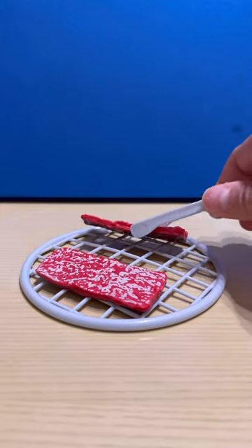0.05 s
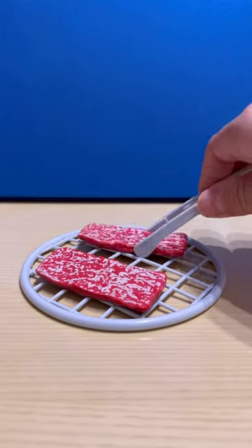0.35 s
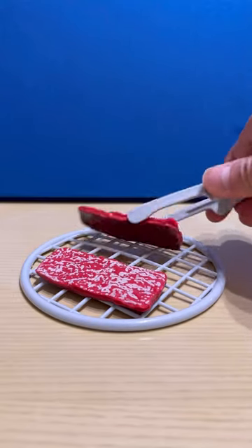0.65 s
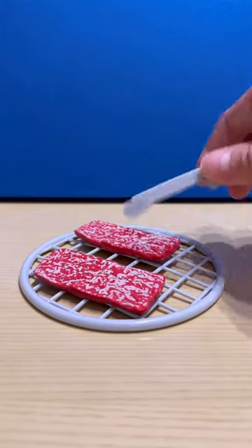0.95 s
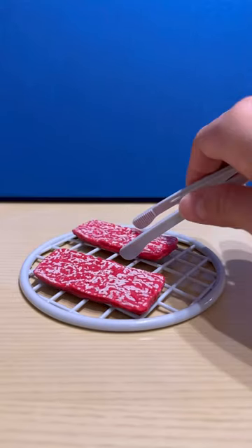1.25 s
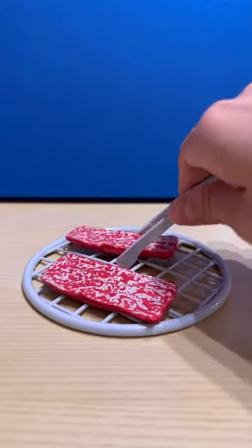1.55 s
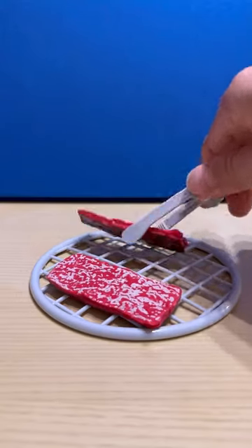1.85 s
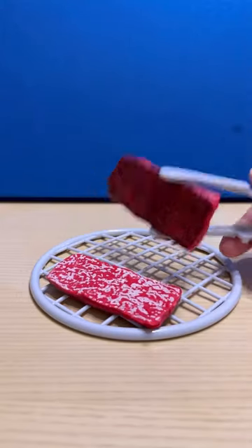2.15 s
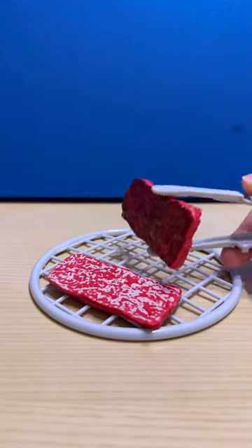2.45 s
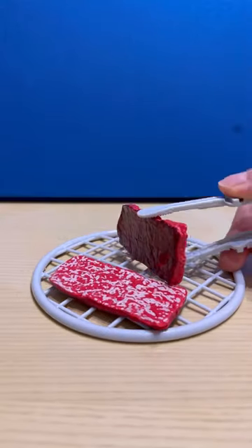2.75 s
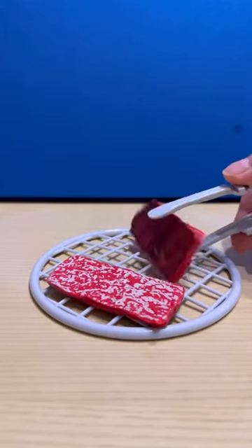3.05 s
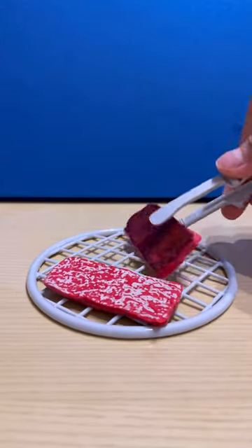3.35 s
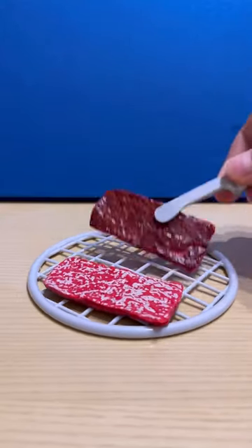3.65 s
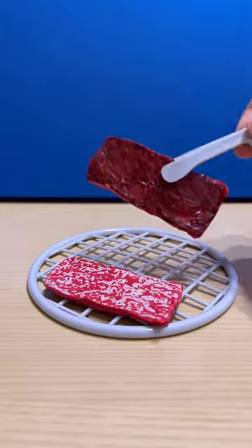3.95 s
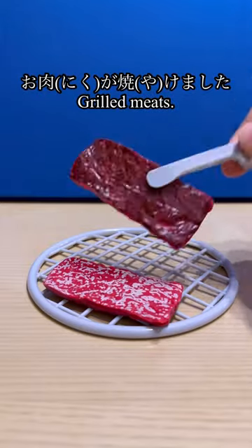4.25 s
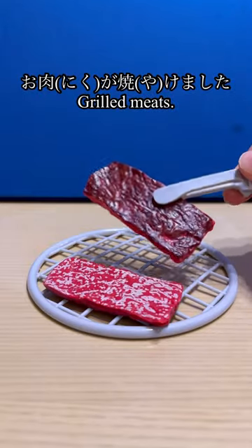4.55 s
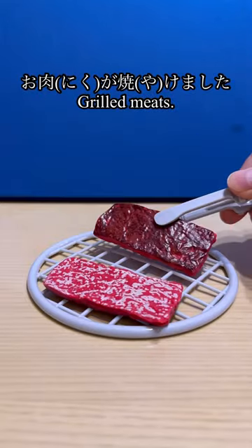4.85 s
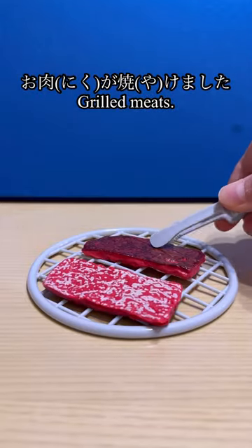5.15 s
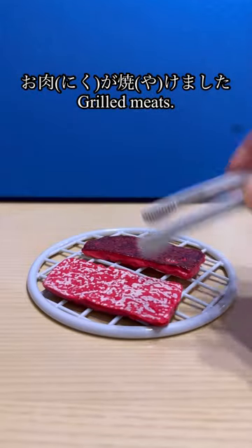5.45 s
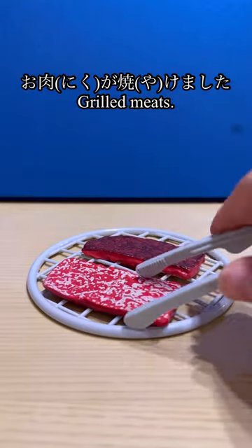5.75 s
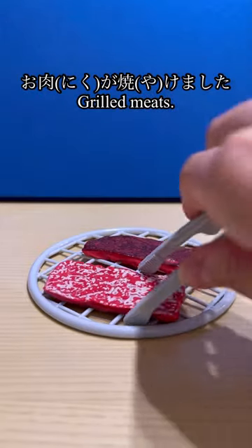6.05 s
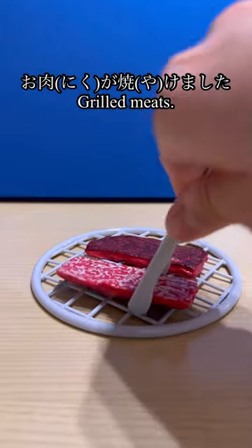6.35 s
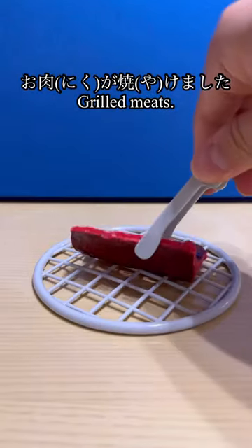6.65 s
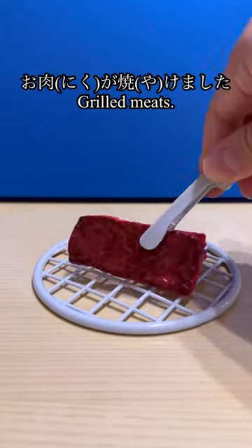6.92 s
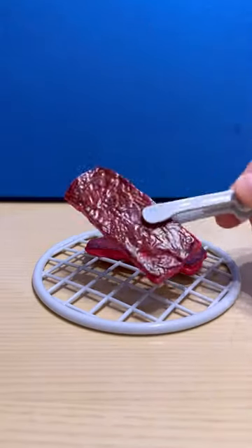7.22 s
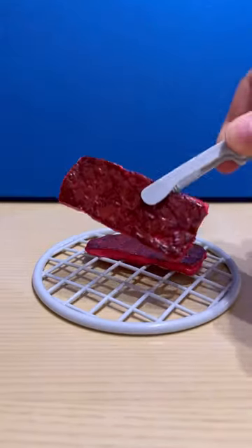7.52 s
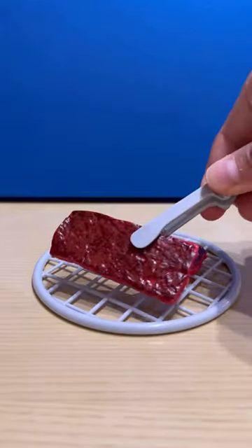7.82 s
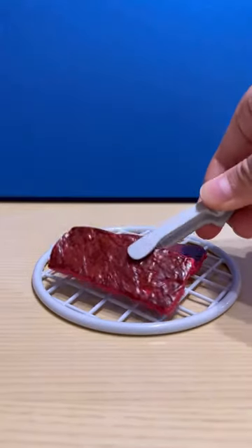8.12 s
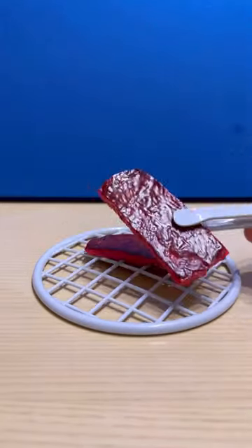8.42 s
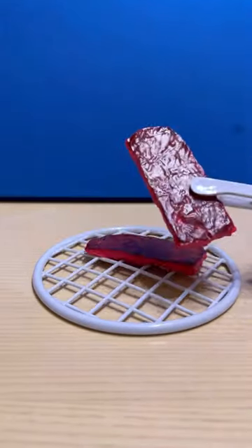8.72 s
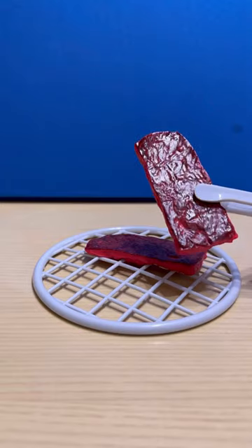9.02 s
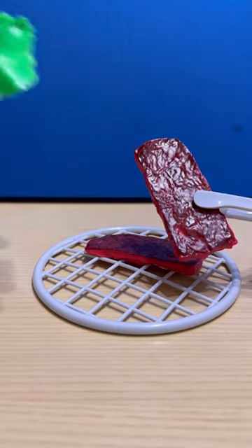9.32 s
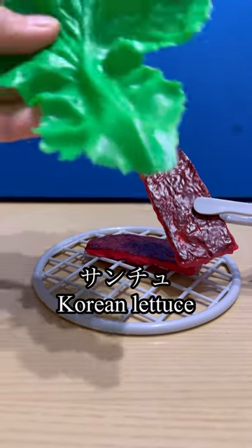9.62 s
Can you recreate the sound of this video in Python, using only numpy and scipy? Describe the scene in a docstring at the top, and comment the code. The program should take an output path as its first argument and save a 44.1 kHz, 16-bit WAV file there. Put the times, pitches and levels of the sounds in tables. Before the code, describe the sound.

Light plastic clicks, brief scrapes and small rattling landings of toy food on a toy grill, close by in a quiet, humming room.

```python
"""Tongs on a toy grill

Plastic tongs turn toy meat slices on a small plastic grill that stands on a table close by.
An impact is an impulse and clicks; sliding friction is a train of tiny slips and chatters.
Either force excites the damped modes of the plastic and thuds through to the tabletop.
A small room adds a short tail, an appliance hums, air flows and electronics whine faintly in pulses."""
import sys
import numpy as np
from scipy import signal
from scipy.fft import rfft, irfft
from scipy.io import wavfile

SR = 44100
rng = np.random.default_rng(int(sys.argv[2]) if len(sys.argv) > 2 else 0)


def put_to_file(sound):
    """Save the sound as 16-bit audio at rate SR, in the file named by the first command-line argument."""
    columns = np.atleast_2d(sound).T  # one column per channel
    safe = np.clip(columns, -1, 1)
    whole_steps = np.round(safe * 32767)
    wavfile.write(sys.argv[1], SR, whole_steps.astype(np.int16))


N = 435708
SIZE = 16384  # samples in one short sound
T = np.arange(SIZE) / SR
HZ = np.maximum(np.fft.rfftfreq(SIZE, 1 / SR), 1)
IMPULSE = np.where(T == 0, 1., 0.)


# slices landing on the grill: start_s, level_db, hardness_db_per_octave, graze_s, rattle_s, rattle_db
LANDINGS = [(0.7539, -22, 1.4, 0.0087, 0.055, -34), (.8018, -24.5, 3, 0.0064, 0.038, -29.5),
            (0.8326, -31.5, 1.5, 0.0042, 0.046, -27), (1.3954, -38, -2.5, .021, .01, -56),
            (1.6178, -37, 0, 0.027, .004, -42.5), (3.0054, -25.5, 2, .023, .038, -27.5),
            (3.0663, -33.5, 1.5, 0.0036, .036, -29.5), (5.1394, -33.5, 2.5, .005, 0.011, -30.5)]

def landings(out):
    """Impact and rebound: a slice grazes the bars, strikes, then rattles in small, duller bounces."""
    for start_s, db, hardness, graze_s, rattle_s, rattle_db in LANDINGS:
        bounces = slips(rattle_s, per_s=1200, scatter_db=6)
        add(out, start_s - graze_s, contact(start_s, slips(graze_s), db - 19.5, hardness=-3))
        add(out, start_s, impact(start_s, db, hardness))
        add(out, start_s + .005, contact(start_s, bounces, rattle_db, hardness - 1.44))


# single taps of tongs and slices: start_s, level_db, hardness_db_per_octave
TAPS = [(0.2166, -52.5, 0.5), (0.3015, -60, -.5), (1.04, -45.5, 4.5), (1.309, -50.5, 1.5),
        (1.4335, -48, -2.5), (2.7505, -56.5, -6), (3.083, -33, 1.5), (3.102, -33.5, 0.5),
        (3.2079, -55.5, -0.5), (3.426, -46, 2.5), (3.4387, -36.5, 10), (3.4423, -35, -2.5),
        (3.462, -31.5, .5), (4.7504, -54, -4), (5.781, -59.5, -5), (5.979, -55, -4.5), (6.028, -56.5, -6.5),
        (6.549, -44.5, -7), (6.597, -55.5, -5.5), (6.6741, -58, 0), (7.998, -54.5, -5)]

def taps(out):
    """Impulse response: each lone blow sounds the plastic and the table as one click."""
    for start_s, db, hardness in TAPS:
        add(out, start_s, impact(start_s, db, hardness))


# tongs sliding over a slice or the bars: start_s, length_s, level_db, hardness_db_per_octave
SCRAPES = [(.23, 0.015, -45.5, -1), (0.509, 0.032, -52, -3.5), (.657, 0.03, -49.5, -4),
           (1.045, 0.01, -46.5, -2.5), (1.23, 0.0041, -44, -1.5), (1.336, 0.029, -52, -1),
           (1.377, 0.017, -49, -3), (2.638, 0.067, -56, -7), (2.688, 0.0071, -47, -4),
           (2.843, 0.027, -49.5, -6), (3.385, .02, -50.5, -3.5), (4.661, 0.023, -46.5, -4.5),
           (5.046, 0.023, -42, -6), (5.123, .013, -44, -6), (5.735, 0.016, -54, -2),
           (5.906, 0.032, -55, -3.5), (6.427, 0.0065, -47, -2.5), (6.512, 0.044, -48, -2),
           (6.698, .043, -42.5, -2.5), (6.717, 0.048, -40.5, -5.5), (9.05, .029, -57.5, 2.5)]

def scrapes(out):
    """Frictional excitation: a train of slips drives the same modes as a blow."""
    for start_s, length_s, db, hardness in SCRAPES:
        add(out, start_s, contact(start_s, slips(length_s), db, hardness))


def slips(length_s, per_s=1700, scatter_db=5, grip_s=.003, release_s=.0037):
    """Stick-slip friction: random force pulses build up, weaken and stop."""
    slipping = rng.random(SIZE) < per_s / SR
    strength = undb(scatter_db * np.clip(rng.standard_normal(SIZE), -2, 2))
    sign = rng.choice([-1, 1], SIZE)
    grip = 1 - np.exp(-T / grip_s)
    fade = np.exp(-np.minimum(T / length_s, 1) - np.maximum(T - length_s, 0) / release_s)
    return slipping * sign * strength * grip * fade


def impact(start_s, db, hardness):
    """Impulsive excitation: a single blow, with less ring than a slide."""
    return contact(start_s, IMPULSE, db, hardness, ring_db=-3)


def contact(start_s, force, db, hardness, ring_db=0):
    """Structural coupling: one force drives plastic and table; soft, light contacts thud more."""
    thud_share_db = -5 - .52 * hardness - .27 * (db + 40)
    return plastic(start_s, force, db, hardness, ring_db) + tabletop(force, db + thud_share_db)


# broad spectrum of a contact: frequency_hz, gain_db
CONTACT_SPECTRUM = [(400, -19.5), (800, -1.5), (1400, -2), (2900, -3.5), (4500, -5.5), (6200, -3.5),
                    (8700, -4.5), (12800, -0.5), (14500, -13), (16500, -22)]
# resonances of the grill: pitch_hz, bandwidth_hz, gain_db
GRILL_MODES = [(1036, 18, -2.5), (2610, 230, -5.5), (3330, 280, -10.5), (8550, 670, 2)]
# close pair of bending modes of the tongs' arms: pitch_hz, bandwidth_hz, gain_db
TONG_MODES = [(1829, 80, 4), (1874, 130, 7.5)]
# how freely the tongs ring, less under a firm grip: time_s, gain_db
TONG_FREEDOM = [(.55, 2), (.75, -6), (.9, -3), (1.2, 0), (1.7, 0), (2.6, -6), (6, -6), (6.55, -1), (8, -1)]

def plastic(start_s, force, db, hardness, ring_db):
    """Modal ringing: a snap and a brief crack, then the decay of the plastic and the room."""
    snap = decay(t60_s=.0066, side_db=-3.5)
    crack = undb(.5 * ring_db + 1) * decay(t60_s=.016, side_db=-5)
    ring = decay(t60_s=.1, side_db=-6.5, delay_s=.0022)
    room = undb(-9) * decay(t60_s=.24, side_db=-3.5, delay_s=.0057)
    # the lower modes carry more of the tail than the treble
    lingering = undb(ring_db + curve([(1000, 6), (2500, 3), (6000, 2), (13000, -6)], HZ))
    response = rfft(snap + crack) + lingering * rfft(ring + room)
    # a softer contact loses the top octaves above 2.2 kHz
    treble_octaves = np.log2(np.clip(HZ, 2200, 12000) / 2200)
    colour = causal(curve(CONTACT_SPECTRUM, HZ) + hardness * treble_octaves)
    freedom_db = np.interp(start_s, *np.transpose(TONG_FREEDOM))
    body = resonances(GRILL_MODES) * resonances(TONG_MODES, lift_db=freedom_db)
    return at_level(irfft(rfft(force) * response * colour * body), db)


# resonances of the grill on the tabletop: pitch_hz, bandwidth_hz, gain_db
TABLE_MODES = [(185, 23, 10.5), (298.3, 29.3, 5), (403, 80, 9), (618, 35, 0.5)]
# broad spectrum of the tabletop: frequency_hz, gain_db
THUD_SPECTRUM = [(50, -27.5), (110, -4), (160, 4), (450, 1), (800, -1.5), (1300, -22), (8000, -77)]

def tabletop(force, db):
    """Structure-borne sound: a force on the table radiates as a short knock with a room tail."""
    knock = decay(t60_s=.023, side_db=-17)
    room = undb(-8) * decay(t60_s=.2915, side_db=-13, delay_s=.0054)
    body = resonances(TABLE_MODES) * causal(curve(THUD_SPECTRUM, HZ))
    return at_level(irfft(rfft(force) * rfft(knock + room) * body), db)


# faint creaks of the tongs in the fingers: start_s, peak_db, centre_hz
CREAKS = [(1.77, -48.5, 2580), (1.901, -50.5, 2700), (5.0163, -48.5, 2480), (6.338, -49.5, 2900),
          (8.23, -50, 4020), (8.3597, -55, 3800), (8.535, -52, 3500), (8.83, -51, 3000), (9.268, -54, 3400)]

def creaks(out, q=.58):
    """Stick-slip at the grip: a few tiny slips excite a heavily damped resonance and the room."""
    skin = 1 / (1 + 1j * HZ / 9000) ** 2  # soft skin takes the top off
    for start_s, peak_db, centre_hz in CREAKS:
        response = decay(t60_s=.009, side_db=-3.5) + undb(-2.5) * decay(t60_s=.31, side_db=-6)
        force = IMPULSE + slips(length_s=.0027)
        resonance = 1 / (1 + 1j * q * (HZ / centre_hz - centre_hz / HZ))
        creak = irfft(rfft(force) * rfft(response) * skin * resonance)
        add(out, start_s, creak * undb(peak_db) / np.abs(creak.mean(axis=0)).max())


def squeak(out, start_s=9.056, length_s=.021, pitch_hz=3170, db=-62):
    """Periodic stick-slip: a slice slides in the tongs with an unsteady tone and a strong octave."""
    wavering_hz = pitch_hz * (1 + .05 * drift(per_s=900)[:SIZE])
    phase = 2 * np.pi * np.cumsum(wavering_hz) / SR
    envelope = np.sin(np.pi * np.minimum(T / length_s, 1))
    tone = undb(db) * (np.sin(phase) + np.sin(2 * phase)) * envelope
    add(out, start_s, np.array([tone, tone]))


# partials of the appliance motor: pitch_hz, rms_db
HUM_PARTIALS = [(63, -55), (133.5, -67.5), (154, -73.5), (252, -77.5), (300, -66.5), (421, -69.5),
                (432.5, -67.5), (561, -77.5)]

def hum(waver_rad=.07):
    """Line spectrum of a motor: steady partials whose phase wavers in proportion to frequency."""
    t = np.arange(N) / SR
    out = np.zeros(N)
    for hz, db in HUM_PARTIALS:
        phase = 2 * np.pi * (hz * t + rng.random())
        waver = waver_rad * hz / HUM_PARTIALS[0][0] * drift(per_s=2.2)
        out += np.sqrt(2) * undb(db) * np.sin(phase + waver)
    return out


# spectrum of the room air: frequency_hz, gain_db
AIR_SPECTRUM = [(25, -39), (50, -13.5), (72, -7), (98, 1), (150, -10), (400, -11), (650, -19), (1350, -34),
                (1580, -35.5), (2050, -27), (7200, -47.5), (8500, -42), (11500, -44), (14000, -58)]
# its stereo width: frequency_hz, side_over_mid_db
AIR_WIDTH = [(90, -31), (200, -11), (380, -12.5), (1290, 5), (2380, -12), (4400, -2)]

def air(rms_db=-57.5):
    """Broadband ventilation noise, coherent between the ears in the bass."""
    hz = np.fft.rfftfreq(N, 1 / SR)
    white = stereo(rfft(rng.standard_normal((2, N))), curve(AIR_WIDTH, hz))
    noise = irfft(white * undb(curve(AIR_SPECTRUM, hz)), N)
    return noise * undb(rms_db) / noise.mean(axis=0).std()


def whine(pitch_hz=11450, db=-72, period_s=1 / 36, width_s=.0012, gap_s=.0036, scatter_db=3):
    """Pulsed carrier: electronics emit faint, uneven pairs of Gaussian tone bursts."""
    out, t = np.zeros((2, N)), T[:256]
    envelope = np.exp(-.5 * ((t - t.mean()) / width_s) ** 2)
    for start_s in np.arange(0, N / SR - period_s, period_s):
        for lag_s in (0, gap_s):
            strength, late, detune = rng.standard_normal(3)
            carrier = np.sin(2 * np.pi * (pitch_hz + 130 * detune) * t)
            pip = undb(db + scatter_db * strength) * envelope * carrier
            add(out, abs(start_s + lag_s + .0011 * late), np.array([pip, pip]))
    return out


def resonances(modes, lift_db=0.):
    """Modal superposition: damped resonators added to a flat response."""
    return 1 + sum(undb(db + lift_db) / (1 + 1j * (HZ / hz - hz / HZ) * hz / bandwidth_hz)
                   for hz, bandwidth_hz, db in modes)


def decay(t60_s, side_db, delay_s=0., rise_s=.00017):
    """Diffuse decay: dense modes or reflections as dying stereo noise of unit energy."""
    age = np.maximum(T - delay_s, 0)
    envelope = (1 - np.exp(-age / rise_s)) * 1000 ** (-age / t60_s)
    tail = stereo(rng.standard_normal((2, SIZE)), side_db) * envelope
    return tail / np.sqrt(np.sum(tail ** 2) / 2)


def causal(db):
    """Minimum-phase response with this gain: nothing sounds before the blow."""
    cepstrum = irfft(np.log(undb(db)))
    fold = np.r_[1, np.full(SIZE // 2 - 1, 2), 1, np.zeros(SIZE // 2 - 1)]
    return np.exp(rfft(cepstrum * fold))


def at_level(x, db):
    """Equivalent level: scale a sound so that its energy, spread over 10 ms, has this level."""
    return x * undb(db) / np.sqrt(np.sum(x.mean(axis=0) ** 2) / (.01 * SR))


def drift(per_s):
    """Random modulation: straight lines between Gaussian values."""
    knots = rng.standard_normal(int(N / SR * per_s) + 2)
    return np.interp(np.arange(N) / SR * per_s, np.arange(len(knots)), knots)


def curve(points, hz):
    """Interpolate decibels on a log-frequency axis."""
    knots_hz, db = np.transpose(points)
    return np.interp(np.log(np.maximum(hz, 1)), np.log(knots_hz), db)


def stereo(pair, side_db):
    """Sum and difference: mid and side to left and right."""
    side = pair[1] * undb(side_db)
    return np.array([pair[0] + side, pair[0] - side])


def undb(db):
    """Decibels to amplitude ratio."""
    return 10 ** (np.asarray(db) / 20)


def add(out, start_s, x):
    """Superpose x on the mix from start_s."""
    i = int(start_s * SR)
    out[:, i:i + x.shape[1]] += x[:, :N - i]


def scene():
    """Linear superposition: the toys over the quiet room."""
    toys = np.zeros((2, N))
    landings(toys)
    taps(toys)
    scrapes(toys)
    add(toys, 2.129, tabletop(IMPULSE, db=-43))  # a soft bump that only the table answers
    creaks(toys)
    squeak(toys)
    return toys + hum() + air() + whine()


def record(dry, cutoff_hz=16000):
    """Band limiting: a steep low-pass removes the very top."""
    return signal.sosfilt(signal.ellip(8, .2, 70, cutoff_hz, fs=SR, output="sos"), dry)


dry = scene()
out = record(dry)
put_to_file(out)
```